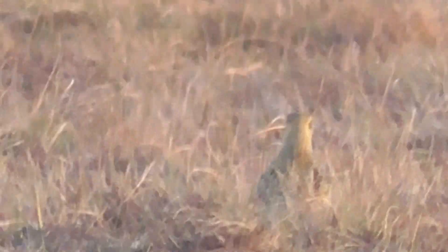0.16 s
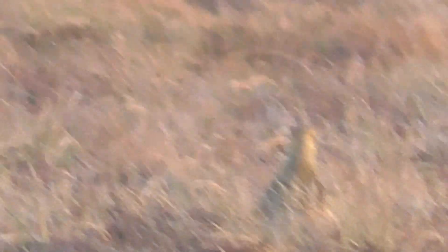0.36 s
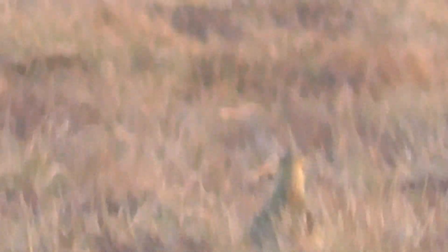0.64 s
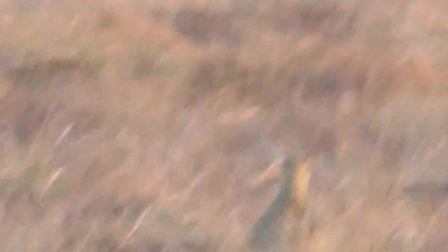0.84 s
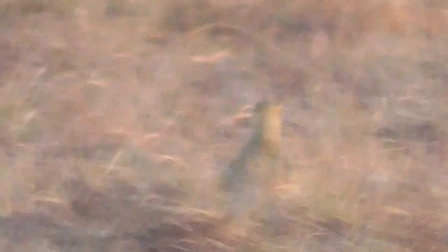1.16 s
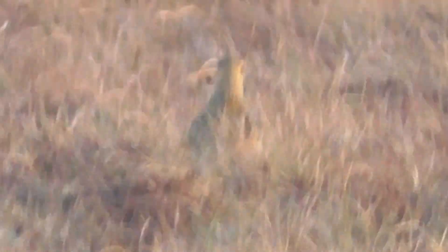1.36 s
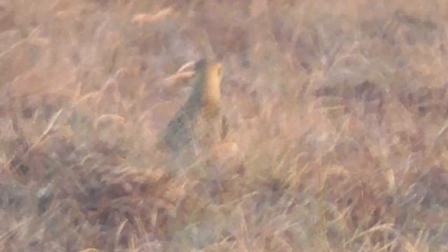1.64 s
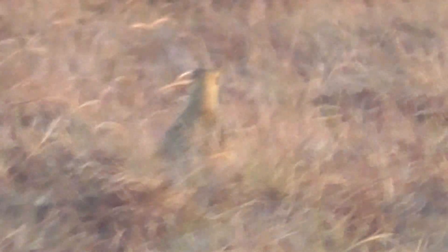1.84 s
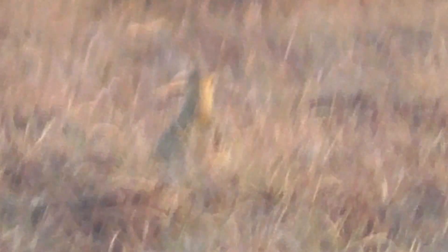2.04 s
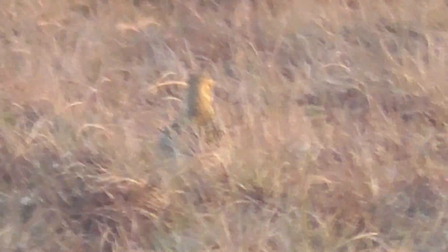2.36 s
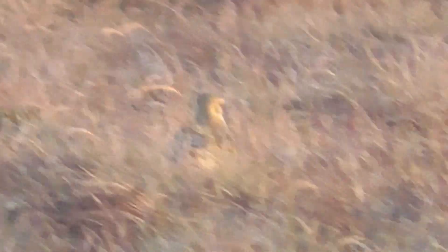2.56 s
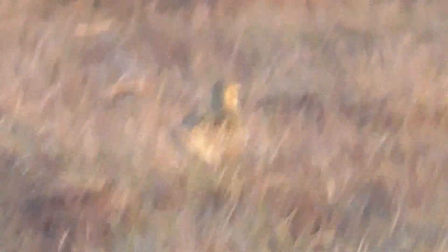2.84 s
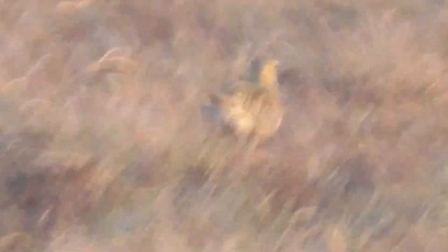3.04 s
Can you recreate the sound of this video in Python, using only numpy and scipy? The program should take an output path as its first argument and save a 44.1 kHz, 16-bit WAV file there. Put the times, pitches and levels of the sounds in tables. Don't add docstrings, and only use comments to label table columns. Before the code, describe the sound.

A plover gives one clear, plaintive whistle over gusty wind hum on open moorland

```python
import sys
import numpy as np
from scipy import signal
from scipy.fft import rfft, irfft
from scipy.io import wavfile

SR = 44100
rng = np.random.default_rng(int(sys.argv[2]) if len(sys.argv) > 2 else 0)


def transcribe(u):
    v = np.clip(np.atleast_2d(u).T, -1, 1)
    q = np.round(v * 32767).astype(np.int16)
    wavfile.write(sys.argv[1], SR, q)


def elevation(decibels):
    levels = np.asarray(decibels, float)
    return 10 ** (levels / 20)


N = 141120
T = np.arange(N) / SR


def evened(x):
    return x / np.sqrt(np.mean(x ** 2) + 1e-20)


def read(points, hz):
    f, value = np.transpose(points)
    return np.interp(np.log(hz + 1), np.log(f + 1), value)


def add(mix, start_s, sound):
    part = mix[..., max(round(start_s * SR), 0):][..., :sound.shape[-1]]
    part += sound[..., :part.shape[-1]]


def place(x, pan_db, lag_s):
    left = irfft(rfft(x) * np.exp(-2j * np.pi * np.fft.rfftfreq(N, 1 / SR) * lag_s), N)
    left_gain, right_gain = elevation(pan_db / 2), elevation(-pan_db / 2)
    return 2 / (left_gain + right_gain) * np.array([left * left_gain, x * right_gain])


def pair(a, b, same):
    same = np.clip(same, -1, 1)
    return np.array([a, same * a + np.sqrt(1 - same ** 2) * b])


def resonate(x, hz, width_hz):
    turn = np.exp(2j * np.pi * np.cumsum(hz * np.ones(x.shape[-1])) / SR)
    r = np.exp(-np.pi * width_hz / SR)
    return evened((turn * signal.lfilter([1], np.poly([r, r, r]), x / turn)).real)


def slow(top_hz):
    rates_hz = np.geomspace(top_hz / 20, top_hz, 20)
    return evened(sum(np.sin(2 * np.pi * (f * T + rng.random())) / np.sqrt(f) for f in rates_hz))


def noise(colour, same):
    edge_hz = 15720
    hz = np.fft.rfftfreq(N, 1 / SR)
    a, b = rfft(rng.standard_normal((2, N)))
    return evened(irfft(pair(a, b, read(same, hz)) * elevation(read(colour, hz)) * (hz < edge_hz), N))


def plover():
    # start_s, pitch_hz, level_db
    whistle = [
        (1.3716, 2500, -72),
        (1.3736, 2330, -49),
        (1.3756, 2116, -48),
        (1.39, 2124, -46),
        (1.418, 2150, -46.7),
        (1.5, 2162, -47),
        (1.76, 2229, -48.7),
        (1.771, 2270, -56),
        (1.779, 2360, -80),
    ]
    # multiple, level_db, slope_db_per_s
    overtones = [(2, -13, -44), (3, -26, -24), (4, -35, -3), (5, -39, -8), (6, -32, -5)]
    rise_s, wobble_hz, echo_db, echo_t60_s = 0.0072, 2.5, -27.5, 0.84
    s, hz, db = np.transpose(whistle)
    turns = np.cumsum(np.interp(T, s, hz) + wobble_hz * slow(40.86)) / SR
    age_s = np.clip(T - s[0], 0, 1)
    rise = np.minimum(age_s / rise_s, 1) ** 2
    tone = np.sin(2 * np.pi * turns)
    for k, level_db, slope_db in overtones:
        gain = rise * elevation(level_db + slope_db * age_s + 0.63 * slow(36.5))
        tone = tone + gain * np.cos(2 * np.pi * round(k) * turns)
    call = np.sqrt(2) * tone * elevation(np.interp(T, s, db, -200, -200))
    t = T[:SR]
    tail = rng.standard_normal((2, SR)) * elevation(-60 * t / echo_t60_s) * np.minimum(t / 0.014, 1)
    echo = signal.fftconvolve(call[None], tail / np.linalg.norm(tail[0]), axes=1)[:, :N]
    return place(call, pan_db=8.5, lag_s=-0.000021) + elevation(echo_db) * echo


def struck(modes, drive):
    t = T[:5000]
    body = np.zeros(5000)
    for k, (hz, db, t60_s) in enumerate(modes):
        body += (-1) ** k * elevation(db - 60 * t / t60_s) * np.sin(2 * np.pi * hz * t)
    out = signal.fftconvolve(drive, body[None], axes=1)
    return out / np.abs(out).max(1, keepdims=True)


def button():
    # start_s, level_db, thump_db, up (0 going down, 1 coming up)
    clicks = [
        (2.688, -31, -45, 0),
        (2.6909, -41, -58, 0),
        (2.6949, -49, -57, 0),
        (2.8574, -39, -46, 1),
        (2.8586, -35.5, -52, 1),
        (2.8602, -43, -55, 1),
        (2.8619, -47, -57, 1),
        (.3665, -59, -75, 0),
    ]
    # pitch_hz, level_db, t60_s
    pressed = [(2400, -13, .008), (3450, -5, .006), (4250, -8, .014), (5035, -4, .013), (5700, -11, .007),
               (6800, -12, .014), (7250, -10, .014), (8710, -12, .013), (9230, -9, .013), (10100, 0, .012),
               (11010, -8, .011), (11570, -11, .012), (12450, -18, .012), (13390, -14, .011)]
    # pitch_hz, level_db, t60_s
    freed = [(2600, -11, .007), (3180, -14, .012), (3570, -16, .012), (4245, -12, .014), (4850, -9, .009),
             (5600, -12, .006), (7225, -2, .011), (7950, -14, .014), (9000, -2, .009), (9920, 0, .01),
             (10600, -6, .006), (11520, -12, .01), (13440, -13, .01), (14700, -20, .006)]
    # pitch_hz, level_db, t60_s
    thump = [(85, -17, .1), (600, -7, .014), (820, -1, .016), (1080, -3, .013), (1320, -3, .012),
             (1570, -4, .013)]
    rattle_s, rattle_db, thump_lag_s = .0005, -16, .0003
    click_pan_db, thump_pan_db = 2.6, 9
    out, t = np.zeros((2, N)), T[:400]
    sides = np.c_[[.5, -.5]]
    push = -np.exp(-((t - .0002 - thump_lag_s * np.c_[[0, 1]]) / .0001) ** 2)
    for s, db, thump_db, up in clicks:
        rattle = pair(*rng.standard_normal((2, 400)), .2) * np.exp(-t / rattle_s)
        drive = (t == 0) + elevation(rattle_db) * rattle
        click = elevation(db + 8 + click_pan_db * sides) * struck(freed if round(up) else pressed, drive)
        add(out, s, click + elevation(thump_db + 8 + thump_pan_db * sides) * struck(thump, push))
    return out


def wind():
    # start_s, gust_db, roar_db (relative to gust)
    gusts = [(0, -50, -17.5), (.16, -51, -25.5), (0.251, -40.5, -23.5), (0.322, -45, -15.5),
             (.37, -32.5, -29.5), (0.452, -43.5, -22.5), (.62, -34, -23), (.79, -38.5, -29.5),
             (.86, -43.5, -25.5), (1.0, -39, -31), (1.27, -48, -21.5), (1.5, -41, -28.5),
             (1.7, -46.5, -28.5), (2.2, -47.5, -20.5), (2.4, -45.5, -20.5), (2.86, -44, -17.5),
             (3.08, -54.5, -18), (3.2, -53, -21.5)]
    # start_s, pitch_hz
    drift = [(0.0, 287), (0.17, 308.5), (0.24, 266), (0.28, 287.4), (0.69, 291.5), (0.73, 267.5),
             (0.88, 290), (1.13, 271), (1.29, 283), (1.37, 260), (1.82, 296.7), (2.11, 271.6), (2.41, 268),
             (2.47, 292.4), (2.59, 274.3), (3.2, 300.6)]
    # start_s, level_db
    buffets = [(0, -83), (.3, -82), (.9, -85), (1.02, -60), (1.2, -73), (1.4, -89), (1.86, -88),
               (1.95, -53), (2.2, -90), (2.55, -61), (3.05, -53.5), (3.2, -47.5)]
    # freq_hz, level_db
    buffet_colour = [(15, -26), (40, 11), (80, 0), (130, 11.5), (220, -37), (500, -70)]
    cavity_floor_hz, cavity_width_hz, wander_hz = 240, 100, 2.54
    cavity_db, leak_db = 0.5, -22
    s, gust_db, roar_db = np.transpose(gusts)
    n = rng.standard_normal((4, N))
    hz = np.interp(T, *np.transpose(drift)) + wander_hz * slow(7.4)
    highpass = signal.butter(2, cavity_floor_hz, "high", fs=SR, output="sos")
    hum = resonate(signal.sosfilt(highpass, n[0]), hz, cavity_width_hz)
    hum = place(hum, pan_db=3.5, lag_s=0.00031)
    hum = hum + elevation(leak_db) * np.outer([1, -1], resonate(n[1], hz, cavity_width_hz))
    roar = resonate(pair(n[2], n[3], 0.018), hz=528, width_hz=370) * elevation([[1.7], [-1.7]])
    gust = np.interp(T, s, gust_db)
    buffet = noise(buffet_colour, [(15, -1), (300, -.9)])
    buffet = buffet * elevation(np.interp(T, *np.transpose(buffets)) + 3 * slow(14))
    roar = roar * elevation(gust + np.interp(T, s, roar_db) + slow(25))
    return hum * elevation(gust + cavity_db) + roar + buffet


def motor():
    # freq_hz, level_db
    tick_colour = [(700, 6), (1100, 4), (2200, -2), (2650, 3), (3200, -3), (3850, -0.5), (5400, -2.5),
                   (6100, -15)]
    moves = [0, 2, 3, 4, 6, 7, 8, 10, 11, 13, 16, 18, 20, 22, 24, 26, 28, 31, 33, 34, 36, 38, 40, 43, 45,
             46, 48, 49, 52, 53, 55, 57, 58, 60, 61, 64, 66, 67, 71, 73, 76, 77, 80, 82, 83, 85, 87, 89, 91,
             92, 93, 94, 98, 100, 102, 103, 105, 107, 109, 112, 113, 116, 117, 119, 120, 124, 127, 128, 129,
             130, 131, 132, 136, 137, 138, 140, 141, 146, 150, 151, 153, 154, 157, 158]
    step_s, peak_s = .02, .0011
    tick_db, spread_db, idle_db = -38.5, 3, -9
    t, out = T[:512], np.zeros((2, N))
    shape = t / peak_s * np.exp(1 - t / peak_s)
    colour = elevation(read(tick_colour, np.fft.rfftfreq(512, 1 / SR)))
    kinds = []
    for _ in range(3):
        rattle = irfft(rfft(rng.standard_normal((2, 512))) * colour)
        kinds.append(pair(*rattle, .4) * shape)
    for k, (size, *blend) in enumerate(rng.random((160, 4))):
        tick = np.tensordot(np.array(blend) - .5, kinds, 1)
        level_db = tick_db - spread_db * size + idle_db * (k not in moves)
        add(out, k * step_s - .0002, tick / np.linalg.norm(tick) * elevation(level_db))
    return out


def note(length_s, hz, to_hz, db, top=None):
    u = np.arange(0, length_s, 1 / SR) / length_s
    path = u if top is None else ((u - top) / (1 - top)) ** 2
    turns = np.cumsum(hz + (to_hz - hz) * path) / SR
    return elevation(db) * np.sqrt(np.sin(np.pi * u)) * np.sin(2 * np.pi * turns)


def far_birds():
    # start_s, level_db, top_pitch_hz
    trill_notes = [(1.015, -69, 3150), (1.059, -69, 3170), (1.0715, -71, 3200), (1.11, -66.5, 3130),
                   (1.125, -65.5, 3170), (1.147, -68, 2960), (1.1707, -65, 3200), (1.184, -67, 3050),
                   (1.2075, -67, 2960), (1.219, -73, 3030), (1.2303, -65, 3200), (1.246, -65, 3040),
                   (1.274, -63.5, 3120), (1.3004, -65, 3150), (1.3175, -67, 3120), (1.331, -67, 3170),
                   (1.357, -63, 3080), (1.369, -69, 3240), (1.3947, -68, 3100), (1.4127, -66, 2990),
                   (1.4244, -74, 3100), (1.4374, -71, 3070), (1.4631, -70, 3040), (1.4774, -71, 3150),
                   (1.5, -71, 3150), (1.517, -70, 2960), (1.531, -71, 3000), (1.5464, -71, 2980),
                   (1.559, -72, 2950), (1.593, -74, 3070), (1.605, -72, 3080), (1.65, -77, 2940),
                   (1.663, -78, 3000), (1.692, -77, 2970), (1.708, -76, 2920), (1.72, -76, 2920),
                   (1.75, -74, 2940), (1.76, -72, 3000)]
    # start_s, level_db
    phrases = [
        (1.699, -78),
        (2.145, -75),
        (2.377, -77),
        (2.61, -77),
        (2.827, -72),
        (3.068, -75),
    ]
    # after_s, length_s, from_hz, to_hz, level_db
    phrase = [
        (0, .02, 5800, 6050, -2),
        (.016, .024, 6000, 5850, -1),
        (.036, .014, 5880, 6700, -4),
        (.055, .012, 4950, 4500, -1),
        (.069, .012, 4500, 4000, -3),
        (.075, .02, 5100, 4450, 1),
        (.09, .024, 5100, 4450, 1),
        (.108, .016, 4500, 4050, 0),
    ]
    # start_s, length_s, from_hz, to_hz, level_db
    lone_notes = [
        (2.98, .018, 2920, 2930, -74),
        (2.208, .02, 1400, 1390, -69),
        (3.008, .045, 3030, 3160, -76),
        (3.04, .072, 3190, 3110, -77),
        (2.875, .016, 4400, 3000, -71),
    ]
    flutter_hz, flutter_db, scatter_db, scatter_t60_s = 150, 1.8, -10, .1
    trill, lark = np.zeros((2, N))
    for s, db, hz in trill_notes:
        add(trill, s, note(.0115, hz + 60, hz - 480, db - 3.5, top=0.4))
    for s, db in phrases:
        for after_s, length_s, hz, to_hz, rel_db in phrase:
            from_hz = hz * rng.uniform(0.96, 1.02)
            add(lark, s + after_s, note(length_s, from_hz, to_hz, db + rel_db + 2 * rng.uniform(-0.6, 1)))
    for s, *row in lone_notes:
        add(lark, s, note(*row))
    scatter = evened(rng.standard_normal(4000) * elevation(-60 * T[:4000] / scatter_t60_s)) / np.sqrt(4000)
    lark = lark * elevation(flutter_db * slow(flutter_hz))
    trill, lark = (x + elevation(scatter_db) * signal.oaconvolve(x, scatter)[:N] for x in (trill, lark))
    return place(trill, 5.6, .00003) + place(lark, 0.5, -0.000041)


def background():
    # freq_hz, level_db
    rumble_colour = [(20, -35), (45, -8), (85, 7), (110, 1.5), (135, 4.5), (160, 1.5), (200, 12.5),
                     (300, -63)]
    # freq_hz, level_db
    hiss_colour = [(300, -28), (700, 5.5), (1500, -6.5), (2800, -15), (5000, -14.5), (6200, -20),
                   (7600, -11.5), (15500, -11.5)]
    # freq_hz, likeness
    hiss_same = [(300, 1), (640, -0.97), (1400, -0.28), (3000, -0.25), (15000, 0.31)]
    # pitch_hz, width_hz, level_db
    housing = [(896, 135, -74.5), (2227, 210, -83), (3875, 330, -85.5)]
    rumble_db, hiss_db = -62.5, -65.5
    air = pair(*rng.standard_normal((2, N)), -0.053)
    rings = sum(elevation(db) * resonate(air, hz, width_hz) for hz, width_hz, db in housing)
    rumble = noise(rumble_colour + [(900, -68)], [(40, 0.33), (150, 0.79)])
    rumble = rumble * elevation([[1.6], [-1.6]]) * elevation(rumble_db + 1.9 * slow(11.0))
    hiss = noise([(100, -32)] + hiss_colour, hiss_same) * elevation([[.6], [-.6]]) * elevation(hiss_db)
    return rumble + hiss + rings


def scene():
    return plover() + button() + wind() + motor() + far_birds() + background()


def roll_off(x):
    return signal.sosfilt(signal.butter(12, 15750, fs=SR, output="sos"), x)


def record(dry):
    return roll_off(dry)


dry = scene()
out = record(dry)
transcribe(out)
```